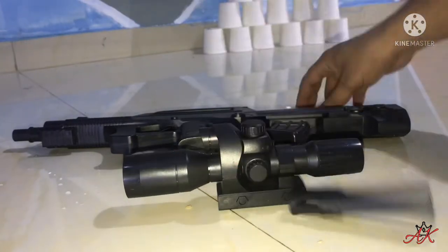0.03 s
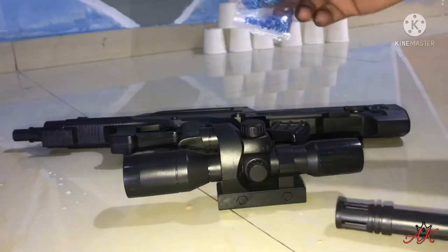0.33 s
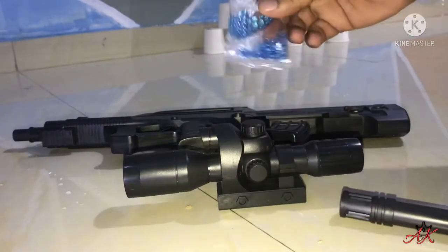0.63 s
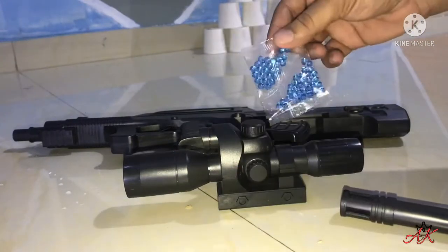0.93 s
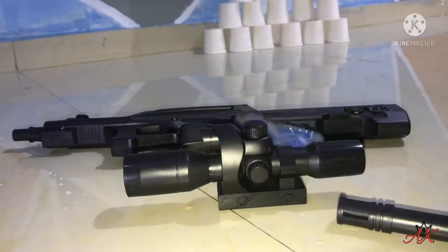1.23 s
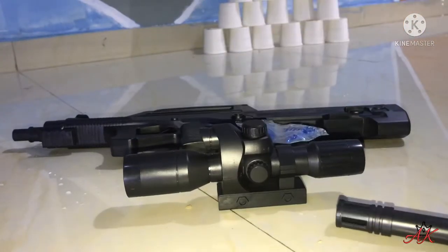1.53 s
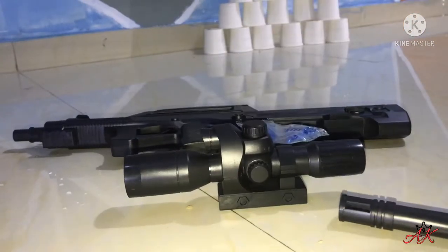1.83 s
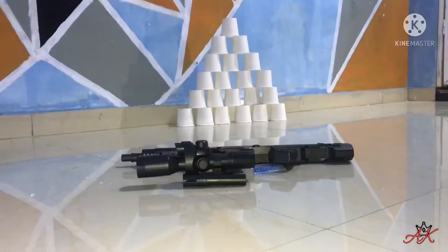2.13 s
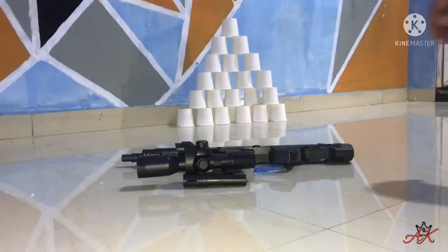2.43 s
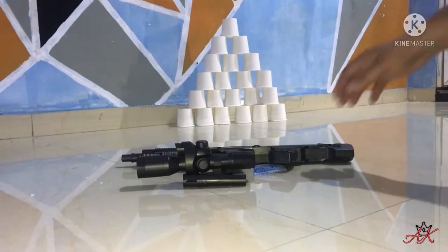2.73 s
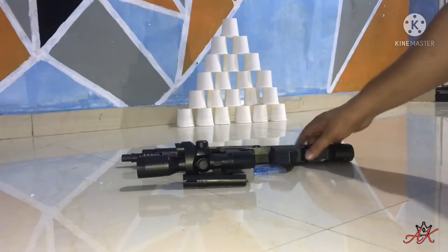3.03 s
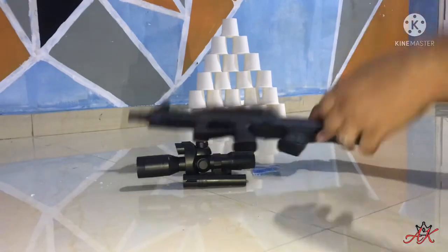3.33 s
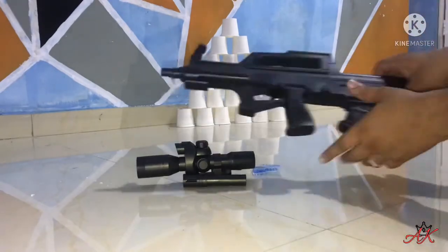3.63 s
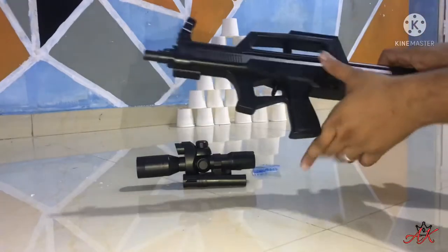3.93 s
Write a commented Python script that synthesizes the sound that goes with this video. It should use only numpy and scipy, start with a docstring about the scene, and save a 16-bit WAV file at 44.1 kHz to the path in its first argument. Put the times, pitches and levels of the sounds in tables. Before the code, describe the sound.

A metal tube clatters on tiles, then a small bag and plastic toy are handled.

```python
"""A metal tube falls on the tiles of a bare room, clatters, scrapes and rocks to rest, ever faster;
each contact rings its modes. A small bag of pellets ticks, drops on a plastic toy and settles.
After a short silent break the room noise is louder and the sounds farther off: a dull footfall
booms, then the toy's hollow shell clacks and scrapes as it is picked up and handled.
Hands and clothes brush faintly on both sides of the break."""
import sys
import numpy as np
from scipy import signal
from scipy.fft import rfft, irfft
from scipy.io import wavfile
from scipy.ndimage import uniform_filter1d

SR = 44100
rng = np.random.default_rng(int(sys.argv[2]) if len(sys.argv) > 2 else 0)


def waveform_to_disk(signal):
    """Save audio, clipped to [-1, 1], as 16-bit WAV at the path in sys.argv[1]."""
    frames = np.transpose(np.atleast_2d(signal))
    scaled = np.clip(frames, -1, 1) * 32767
    samples = np.round(scaled).astype(np.int16)
    wavfile.write(sys.argv[1], SR, samples)


N = 176400
T = np.arange(N) / SR

# room noise before and after the break: freq_hz, density_db
NEAR_NOISE = [(18, -67), (30, -43), (64, -1.5), (174, -12), (221, -1), (394, -6.5), (426, -11), (512, -7.5),
              (721, -15), (937, -12), (1040, -16.5), (1130, -14.5), (1630, -13), (1910, -17), (3220, -26.5),
              (3670, -31.5), (16000, -42.5)]
FAR_NOISE = [(15, -40.5), (25, -30), (48, -2), (64, -0.5), (82, -16), (157, 1.5), (195, -2), (317, -2),
             (476, -10.5), (641, -12.5), (1190, -11.5), (1840, -20.5), (3720, -30.5), (9570, -39),
             (10400, -41.5), (14800, -40), (16000, -49)]
# reverb decay: freq_hz, t60_s
ROOM_DECAY = [(300, 0.35), (2000, 0.65), (5000, .56), (9000, 0.49), (16000, 0.42)]
# reverb colour: freq_hz, gain_db
ROOM_COLOUR = [(300, 0.5), (1500, 2.5), (3000, 0), (5000, -1), (9000, -2.5), (15000, 0.5)]
# tube on tiles: start_s, level_db, sing_offset_db, middle_offset_db, deep_offset_db
TUBE_HITS = [(.016, -33.5, -15.5, -8, -5), (.026, -38, -23.5, 1.5, -8), (.041, -40.5, -15.5, 8, -7),
             (.062, -41.5, -11.5, 15.5, -5), (.082, -35.5, -7, 15, -5), (.109, -14.5, -16.5, -12, -2),
             (.1655, -27, -11, -14, -14), (.168, -29.5, -23, 14, -8), (.195, -20, -6.5, -18, -18),
             (.2022, -21, -9, -12, -13.5), (.218, -29, -5, -5, -10), (.267, -32, -26.5, 4.5, -8),
             (.2725, -20, -5.5, 5, -19), (.2745, -20.5, -10.5, -1, -10), (.313, -31.5, -13, 14, -9),
             (.328, -25, -11.5, -12, -6), (.334, -33, -9, 0.5, -10), (.349, -29, -5, -4, -8),
             (.3785, -17, -20.5, 7.5, -4.5), (.402, -33.5, -12, 1.5, -1), (.419, -27.5, -5, -7, -2),
             (.422, -35, -26, 2, 1), (.458, -31.5, -1.5, -9, 5), (.474, -40, -2, -8, -17),
             (.484, -31.5, -2.5, -5, 4), (.513, -34.5, -5, -4, 3), (.524, -42.5, -20, 11, 0),
             (.530, -33, -4.5, 4, 2), (.538, -36, -14, -7, -2)]
# bounce before time zero, still ringing in the room: same columns
OPENING_HIT = (-0.0546, -9.5, -8, -5, -2.5)
# floor-damped tube modes: pitch_hz, level_db, t60_s
TUBE_MODES = [(2820, -8, 0.015), (5030, -16, 0.025), (5710, -16.5, 0.024), (7260, -9, 0.032),
              (7420, -2, 0.017), (7610, -6, 0.016), (8716, -6.5, 0.036), (8930, -1.5, 0.014),
              (10180, -17, 0.028), (10530, -7, 0.0149), (12200, -1.5, 0.014), (12900, -18, .025),
              (13170, -7, 0.03), (15380, -11, 0.013)]
# tube scraping as it rolls, low body of its loud hits, one short clink:
# centre_s, sigma_s, level_db, low_hz, high_hz
TUBE_NOISES = [(.022, 0.027, -42, 1200, 12000), (.125, .015, -51, 1200, 3000),
               (.1685, 0.00061, -31, 4200, 6600), (.2, 0.017, -53, 1200, 3000),
               (.46, 0.068, -51, 6000, 14000)]
# hands and clothes: centre_s, sigma_s, level_db, low_hz, high_hz
RUSTLES = [(.885, 0.016, -58, 1500, 4200), (1.157, 0.0037, -60, 4500, 12970), (1.38, .03, -63, 2000, 8000),
           (1.61, 0.037, -66.5, 1800, 4970), (1.84, 0.032, -63.5, 1490, 4030),
           (2.346, 0.024, -51.5, 1480, 3120), (2.40, 0.054, -61, 4000, 14000),
           (3.44, 0.071, -54.5, 1500, 10000), (3.621, 0.016, -52.5, 2500, 14000),
           (3.645, 0.038, -49.5, 1480, 4800), (3.69, 0.096, -59.5, 2500, 14000),
           (3.965, 0.013, -50, 1410, 2930)]
# bag and pellets on the toy: start_s, level_db, low_hz, high_hz, t60_s
BAG_CLICKS = [(1.0302, -22, 5650, 12500, .004), (1.1665, -29, 3300, 10700, 0.0057),
              (1.195, -42, 4500, 11000, 0.025), (1.2243, -22, 1400, 7000, .007),
              (1.2262, -26.5, 1500, 12000, 0.012), (1.281, -40, 2000, 12000, .008),
              (1.3225, -39.5, 1600, 6000, 0.02)]
# footfall thud: freq_hz, density_db
STEP_SPECTRUM = [(40, -13), (60, 6.5), (110, -5), (170, 0.5), (260, -6.5), (380, 3), (550, -4), (750, -37),
                 (2000, -66)]
# low room modes: pitch_hz, level_db, t60_s
BOOM_MODES = [(57.9, -44.5, .8), (165.4, -42, 0.34)]
# toy gripped and lifted: start_s, level_db, low_hz, high_hz, t60_s
TOY_CLICKS = [(2.228, -55, 4000, 14000, 0.0031), (2.51, -44, 1520, 3970, 0.01),
              (3.097, -42, 1500, 4530, 0.014), (3.1378, -31.5, 960, 4200, 0.036),
              (3.1447, -22.5, 3000, 13100, 0.0037), (3.1688, -30, 794, 4500, 0.016),
              (3.1968, -24, 1400, 5500, 0.0057), (3.2042, -15, 2000, 15000, 0.0028),
              (3.2146, -14, 1300, 11200, 0.022), (3.2195, -29, 4000, 11900, 0.009),
              (3.261, -29, 1200, 6000, 0.017), (3.448, -40, 2000, 7000, .012),
              (3.573, -49, 1500, 5000, .012), (3.598, -41.5, 1380, 3900, 0.017),
              (3.7838, -35, 2000, 7000, 0.014), (3.826, -40, 1500, 7850, 0.0061),
              (3.90, -50, 3000, 12000, 0.012)]
# toy on tiles: centre_s, sigma_s, level_db, low_hz, high_hz
TOY_SCRAPES = [(3.181, 0.0087, -35, 470, 3600), (3.185, .003, -34, 13000, 15700)]
# hollow shell colour: centre_hz, gain_db, q
SHELL_BANDS = [(520, 18, 6.9), (1560, 3.5, 1.34), (2900, 2.5, 4.6), (4600, -4.5, 2.5), (8800, 2, 7.4)]


def from_db(db):
    """Decibels to gain."""
    return 10 ** (np.asarray(db) / 20)


def unit_rms(x):
    """Scale to rms 1."""
    return x / np.sqrt(np.mean(x ** 2) + 1e-20)


def at_hz(points, hz):
    """Table lookup on a log-frequency axis."""
    freqs_hz, values = np.transpose(points)
    return np.interp(np.log(np.maximum(hz, 1)), np.log(freqs_hz), values)


def band(x, low_hz, high_hz):
    """Causal band-pass."""
    edges_hz = [low_hz, min(high_hz, .45 * SR)]
    return signal.sosfilt(signal.butter(2, edges_hz, "band", fs=SR, output="sos"), x)


def decay(t, t60_s):
    """Exponential decay; 1 for t < 0."""
    return np.exp(-np.log(1000) * np.maximum(t, 0) / t60_s)


def ramp(t, rise_s):
    """Linear rise from 0 to 1."""
    return np.clip(t / rise_s, 0, 1)


def noise(spectrum):
    """Steady coloured noise, rms 1."""
    gains = from_db(at_hz(spectrum, np.arange(N // 2 + 1) * SR / N))
    return unit_rms(irfft(rfft(rng.standard_normal(N)) * gains, N))


def tail_envelope(hz, delay_s=.002):
    """Reflections build up, then decay at the band's rate."""
    return ramp(T[:SR] - delay_s, rise_s=.018) * decay(T[:SR], at_hz(ROOM_DECAY, hz))


def reverb(x, wet_db):
    """Direct sound plus the diffuse tail of hard walls."""
    edges_hz = np.geomspace(150, 19000, 11)
    tail = np.zeros(SR)
    for low_hz, high_hz in zip(edges_hz, edges_hz[1:]):
        hz = np.sqrt(low_hz * high_hz)
        reflections = band(rng.standard_normal(SR), low_hz, high_hz)
        tail += reflections * tail_envelope(hz) * from_db(at_hz(ROOM_COLOUR, hz))
    return x + from_db(wet_db) * signal.fftconvolve(x, tail / np.linalg.norm(tail))[:len(x)]


def tube(hits, sing_hz=3631, split_hz=43, deep_below_hz=3200, middle_below_hz=6000, lead_s=.1):
    """Each contact cracks and rings the modes, slightly detuned; a beating pair sings just after."""
    t, lead = T[:SR // 10], int(lead_s * SR)
    scatter_db, detune_ratio, sing_gain_db = 2.5, .009, 6.5
    hz, mode_db, t60_s = np.transpose(TUBE_MODES)
    envelopes = np.array([decay(t, d) for d in t60_s]) * ramp(t, rise_s=.00068)
    pair = np.sin(2 * np.pi * sing_hz * t) - np.sin(2 * np.pi * (sing_hz + split_hz) * t)
    pair *= decay(t, t60_s=.036)
    clinks, singing = np.zeros((2, N + lead))
    for start_s, level_db, sing_db, middle_db, deep_db in hits:
        strength, shift = rng.standard_normal((2, len(hz)))
        # the contact point sets each mode family's level
        family_db = np.where(hz < deep_below_hz, deep_db, middle_db * (hz < middle_below_hz))
        gains = from_db(mode_db + scatter_db * strength + family_db)
        cycles = np.outer(hz * (1 + detune_ratio * shift), t) + rng.random((len(hz), 1))
        ring = gains @ (envelopes * np.sin(2 * np.pi * cycles))
        crack = band(rng.standard_normal(len(t)) * decay(t, t60_s=.01), low_hz=4500, high_hz=15000)
        i = int((start_s + lead_s) * SR)
        clinks[i:i + len(t)] += from_db(level_db) * (ring + crack)
        singing[i:i + len(t)] += from_db(level_db + sing_db + sing_gain_db) * pair
    return from_db(-.2) * (reverb(clinks, wet_db=-10.5) + reverb(singing, wet_db=-9))[lead:]


def contact_noise(rows, grain_depth=.12):
    """Rubbing or brief contact: Gaussian swells of grainy noise."""
    hiss = rng.standard_normal(N)
    roughness = unit_rms(uniform_filter1d(rng.standard_normal(N), size=90))
    grains = hiss * np.exp(grain_depth * roughness)
    out = np.zeros(N)
    for centre_s, sigma_s, level_db, low_hz, high_hz in rows:
        swell = np.exp(-((T - centre_s) / sigma_s) ** 2 / 2)
        out += from_db(level_db) * swell * unit_rms(band(grains, low_hz, high_hz))
    return out


def rocking_hits(start_s=.554, first_gap_s=.0275, gap_ratio=.845, first_db=-37, loss_db=1.8):
    """The tube rocks to rest, each contact sooner and weaker."""
    sing_db, middle_db, deep_db = -9.5, -4, 5
    times_s = start_s + first_gap_s * (1 - gap_ratio ** np.arange(13)) / (1 - gap_ratio)
    return [(s, first_db - loss_db * k, sing_db, middle_db, deep_db) for k, s in enumerate(times_s)]


def plastic_clicks(rows):
    """Dense, quickly damped modes: one noise burst per contact."""
    out, size = np.zeros(N + SR), SR // 8
    for start_s, level_db, low_hz, high_hz, t60_s in rows:
        envelope = decay(T[:size], t60_s)
        burst = band(rng.choice([-1, 1], size) * envelope, low_hz, high_hz)
        i = int(start_s * SR)
        out[i:i + size] += from_db(level_db) * burst * np.linalg.norm(envelope) / np.linalg.norm(burst)
    return out[:N]


def room_wash(x, wet_db):
    """Same room for dense clicks: each band's energy lingers as smooth noise."""
    edges_hz = np.geomspace(300, 18000, 13)
    wash, white = np.zeros(N), rng.standard_normal((2, N))
    for k, (low_hz, high_hz) in enumerate(zip(edges_hz, edges_hz[1:])):
        hz = np.sqrt(low_hz * high_hz)
        tail_power = tail_envelope(hz) ** 2
        power = signal.fftconvolve(band(x, low_hz, high_hz) ** 2, tail_power / tail_power.sum())[:N]
        carrier = unit_rms(band(white[k % 2], low_hz, high_hz))
        wash += from_db(at_hz(ROOM_COLOUR, hz)) * np.sqrt(np.abs(power)) * carrier
    return x + from_db(wet_db) * wash


def pellet_bag(settle_s=1.234, ticks_per_s=1200):
    """The bag ticks and lands; its pellets settle in fading random ticks."""
    clicks = plastic_clicks(BAG_CLICKS)
    ticks = rng.standard_normal(N) * (rng.random(N) < ticks_per_s / SR)
    ticks *= (T > settle_s) * decay(T - settle_s, t60_s=.23)
    pellets = from_db(-17) * band(ticks, low_hz=1280, high_hz=4400)
    return from_db(-1.3) * room_wash(clicks + pellets, wet_db=-8)


def footfall(start_s=2.145, thud_rise_s=.045, boom_rise_s=.13):
    """A dull thud excites the room's low modes."""
    t = T - start_s
    thud = noise(STEP_SPECTRUM) * ramp(t, thud_rise_s) * decay(t - thud_rise_s, t60_s=.38)
    boom = sum(from_db(level_db) * np.sin(2 * np.pi * hz * t) * decay(t - boom_rise_s, t60_s)
               for hz, level_db, t60_s in BOOM_MODES)
    return from_db(-35) * thud + boom * ramp(t, boom_rise_s)


def plastic_toy():
    """Clacks and scrapes, coloured by the hollow shell's peaks and dip."""
    body = plastic_clicks(TOY_CLICKS) + contact_noise(TOY_SCRAPES)
    for hz, gain_db, q in SHELL_BANDS:
        resonance = signal.lfilter(*signal.iirpeak(hz, q, fs=SR), body)
        body = body + (from_db(gain_db) - 1) * resonance
    return from_db(-.63) * room_wash(body, wet_db=-2.5)


def scene(break_start_s=1.925, break_end_s=1.958):
    """Tube and bag close by, a silent break, then footfall and toy farther off."""
    bag, toy = pellet_bag(), plastic_toy()
    near = tube([OPENING_HIT, *TUBE_HITS, *rocking_hits()]) + contact_noise(TUBE_NOISES) + bag
    near += from_db(-50.5) * band(noise(NEAR_NOISE), low_hz=52, high_hz=SR / 2)
    far = footfall() + toy + from_db(-43.5) * noise(FAR_NOISE)
    brushing = contact_noise(RUSTLES)
    fade_out = ramp(break_start_s - T, .017)
    fade_in = ramp(T - break_end_s, rise_s=.15)
    return ((near + brushing) * fade_out + (far + brushing) * fade_in)[None]


def record(dry, cutoff_hz=15900):
    """Steep low-pass."""
    return signal.sosfilt(signal.ellip(10, .2, 80, cutoff_hz, fs=SR, output="sos"), dry)


dry = scene()
out = record(dry)
waveform_to_disk(out)
```